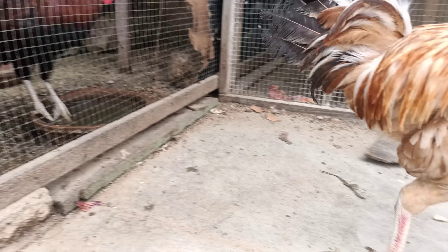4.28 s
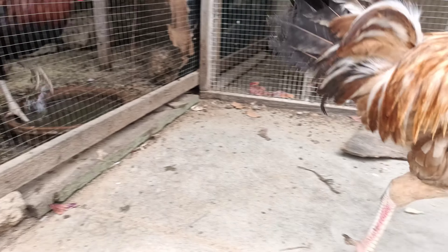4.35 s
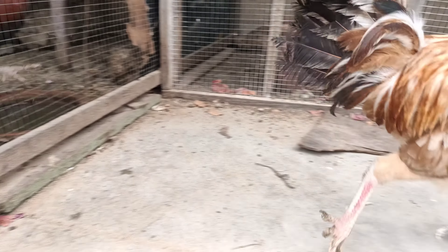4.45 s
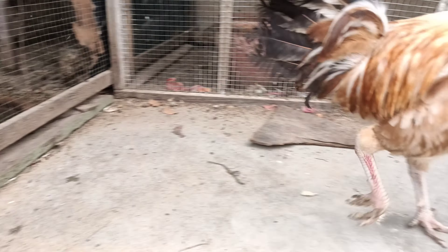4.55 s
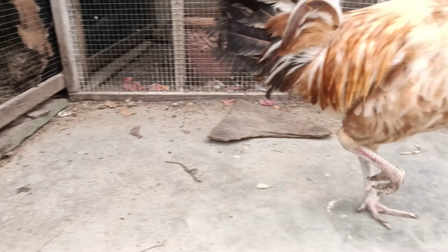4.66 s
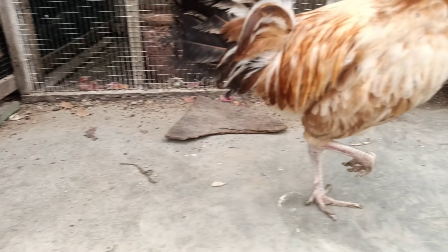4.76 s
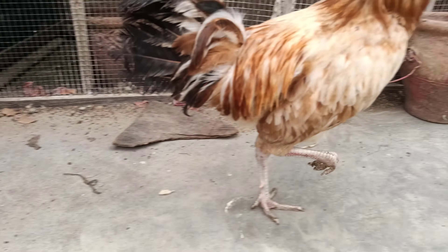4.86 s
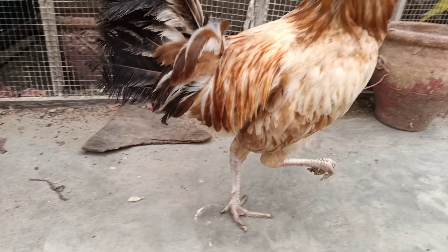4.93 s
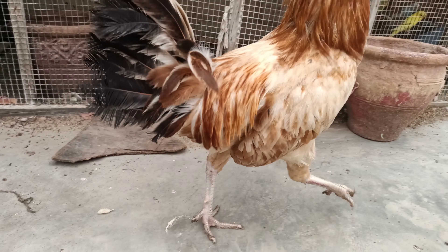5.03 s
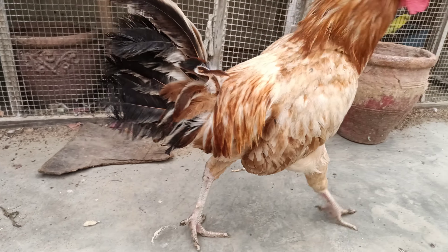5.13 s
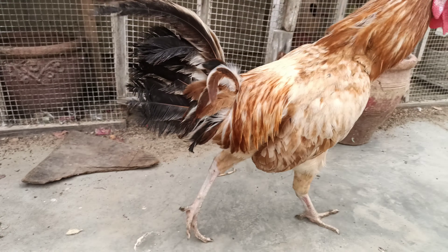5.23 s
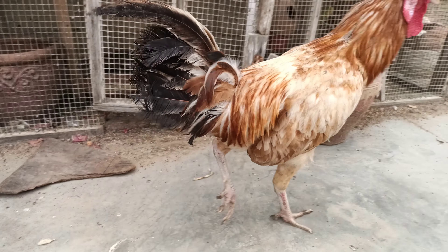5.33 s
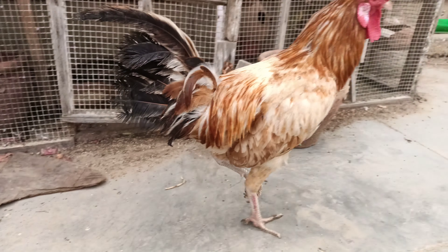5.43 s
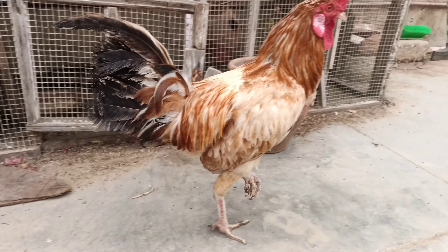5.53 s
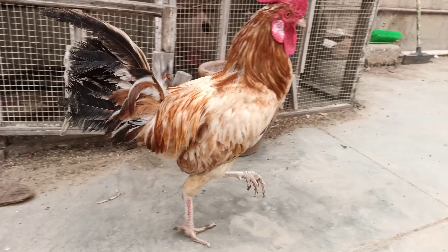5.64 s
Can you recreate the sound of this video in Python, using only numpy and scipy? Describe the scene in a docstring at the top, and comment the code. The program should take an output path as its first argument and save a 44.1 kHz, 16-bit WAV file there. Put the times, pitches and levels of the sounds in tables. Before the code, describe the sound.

Wind buffets the microphone while a small bird chirps raspily, then roosters cluck softly close by and claws click on concrete.

```python
"""A walled concrete yard, microphone hand-held, with wind buffeting its right port from the start.
Far fowl call, something metallic rings faintly, grit ticks and a small bird squeaks hoarsely.
The wind booms near 1 s; then the bird, a little to the right, chirps in runs of raspy falling notes.
From 3.5 s roosters cluck close by, voice pulses ringing their throats. Far calls and a second thin ring
follow, claws click on the concrete and a soft rustle comes up as the nearest rooster walks past."""
import sys
import numpy as np
from scipy import signal
from scipy.fft import rfft, irfft
from scipy.io import wavfile
from scipy.ndimage import uniform_filter1d, minimum_filter1d

SR = 44100
rng = np.random.default_rng(int(sys.argv[2]) if len(sys.argv) > 2 else 0)


def generate_wav(signal):
    """Clip the signal to [-1, 1] and save it as 16-bit WAV at the path in sys.argv[1]."""
    frames = np.transpose(np.atleast_2d(signal))
    scaled = np.clip(frames, -1, 1) * 32767
    pcm = np.round(scaled).astype(np.int16)
    wavfile.write(sys.argv[1], SR, pcm)


N = 250929
TIME = np.arange(N) / SR


def cluck(length, first_hz, top_hz, db, beak, rough=.23, peak_at=.68, sag=0.89):
    """About ten uneven pulses of arching rate ring the throat; a shut beak lowers and muffles it."""
    # throat resonances before the beak retunes them: (frequency [Hz], width [Hz], gain [dB])
    throat = [(310, 330, -1.5), (472, 100, 9.5), (870, 77, 12), (1720, 60, -9.5), (3280, 57, -23),
              (5000, 290, -39)]
    u = np.arange(round((length + 0.033) * SR)) / SR / length
    pitch = np.interp(u, [0, peak_at, 1], [first_hz, top_hz, top_hz * sag])
    pitch *= 1 + 0.17 * rough * wander(len(u), 277)
    turns = np.cumsum(pitch) / SR
    pulses = sum(np.cos(2 * np.pi * k * turns) for k in range(1, 36)) * amp(1.5 * wander(len(u), 186))
    puffs = np.exp(-(turns % 1) / .45) * rng.standard_normal(len(u))  # air escapes with each pulse
    effort = np.sin(np.pi * np.minimum(u, 1) ** 1.25).clip(0) ** 1.3
    drive = effort * (unit(pulses) + 2 * rough * unit(puffs))
    tuning = np.interp(beak, [0, 1], [0.62, 1.666])  # resonances rise as the beak opens
    tuning = tuning * (1 + 0.2 * (effort - .8))  # it opens further with effort
    voice = sum((-1) ** k * amp(level) * resonate(drive, hz * tuning, width)
                for k, (hz, width, level) in enumerate(throat))
    voice += amp(-21.5) * effort * resonate(unit(puffs), 6200, 3100)  # rasp at the edge of the beak
    muffle_db = -7.5 * max(1 - beak / 0.83, 0)
    return amp(db) * tint(voice, [(120, -6.0), (350, 9), (1000, muffle_db / 2), (1900, muffle_db + 6.5),
                                  (6500, muffle_db + 13), (12000, muffle_db - 3.0)])


def roosters():
    """Roosters clucking close to the microphone."""
    # (time [s], length [s], first pitch [Hz], top pitch [Hz], relative level [dB], beak opening [0-1])
    clucks = [(3.582, 0.041, 209.5, 351.6, -26.5, 0.5), (3.686, 0.034, 276, 337, -29, 0.36),
              (3.865, 0.034, 282.6, 342.4, -27, 0.39), (4.418, 0.032, 248, 264.6, -39.5, 0.01),
              (4.492, 0.038, 329.4, 432, -36, 0), (4.604, 0.034, 203, 310, -33.5, 0.42),
              (4.74, 0.023, 278, 291, -36.5, 0.4), (4.882, 0.032, 255.6, 315.7, -32, 0.44),
              (5.029, 0.031, 206, 268.7, -33, 0.64), (5.45, 0.044, 243, 280.7, -41, 0.09)]
    return play(clucks, cluck)


def slur(t, top_hz, fall_s, rough, overtone_db=0, low_hz=1860):
    """A thin falling whistle with two overtones; it warbles, breaks up and frays into a rasp."""
    # the small bird's throat, shaping overtones and rasp: (frequency [Hz], gain [dB])
    rasp_colour = [(1200, -29), (1650, -26), (2100, 3.5), (3000, 7.5), (4100, -3.5), (5300, -15),
                   (6500, -18.5), (8400, -13.5), (10000, -28)]
    # the same throat's effect on the fundamental: (frequency [Hz], gain [dB])
    throat_gain = [(1800, -5), (3100, 3), (4400, 1)]
    resonance_hz, spacing_hz, pull = 3106, 953, 0.852
    buzz_hz, breaks_db, breaks_hz = 426.8, 4, 65
    size = len(t)
    fallen = 1 - 1 / (1 + (t / fall_s) ** 2)
    pitch = (top_hz + (low_hz - top_hz) * fallen) * (1 + .025 * wander(size, 47.8))
    # the note lingers and swells on evenly spaced throat resonances
    catch = 2 * np.pi * (pitch - resonance_hz) / spacing_hz
    pitch -= pull * np.sin(catch) * spacing_hz / (2 * np.pi)
    rough = np.clip(rough + .35 * fallen ** 2, 0, 1)
    shake = 1 + (.008 + .09 * rough ** 2) * wander(size, 250)
    phase = phase_of(pitch * shake)
    fundamental = amp(2 * np.cos(catch) + read(throat_gain, pitch)) * np.sin(phase)
    overtones = sum(amp(read(rasp_colour, k * pitch) - 13 * fallen ** 2) * np.sin(k * phase)
                    for k in (2, 3))
    # on rough notes a slower vibration of the voice box throws sidebands, and its other side joins in
    buzz = np.sin(phase_of(buzz_hz * (1 + 0.242 * wander(size, 93.0))))
    whistle = (fundamental + amp(2.0 + overtone_db) * overtones) * (1 + 0.94 * rough * buzz)
    other_side = np.sin(phase_of(np.maximum(.74 * pitch, low_hz) * shake))
    whistle += rough * amp(breaks_db * wander(size, breaks_hz)) * other_side
    rasp = tint(tint(rng.standard_normal(size), rasp_colour), [(4000, 0.021), (6000, overtone_db)])
    rasp *= amp(0.48 * np.sin(phase_of(130 + 40 * wander(size, 47))))
    rasp_share = .95 * rough ** 2.3
    voice = np.sqrt(1 - rasp_share) * unit(whistle) + np.sqrt(rasp_share) * unit(rasp)
    flicker_db = 3 * wander(size, 220) + breaks_db * rough * wander(size, breaks_hz)
    return unit(voice * amp(flicker_db))


def chirp(top_hz, fall_s, db, rough, overtone_db, falls=2.9, attack_s=.006, fade_db_per_fall=5.5):
    """A slur that starts quickly and fades as it falls; its length is counted in fall times."""
    t = np.arange(round(falls * fall_s * SR)) / SR
    shape = np.minimum(t / attack_s, 1) * np.minimum(2 * (falls - t / fall_s), 1)
    return amp(db - fade_db_per_fall * t / fall_s) * shape * slur(t, top_hz, fall_s, rough, overtone_db)


def squeak(length, db):
    """One short, hoarse slur."""
    t = np.arange(round(length * SR)) / SR
    voice = slur(t, top_hz=3450, fall_s=0.044, rough=0.716)
    return amp(db) * unit(voice * signal.windows.tukey(len(t), .7))


def small_bird(scatter_s=0.014, chatter_per_s=9, chatter_until_s=1.9, chatter_db=-47):
    """Chirps, squeaks and faint chatter right of centre, heard directly and by early reflections."""
    # (time [s], top pitch [Hz], fall time [s], relative level [dB], roughness [0-1], overtones [dB])
    chirps = [(1.268, 3330, 0.045, -41, 0.17, -2), (1.365, 3300, 0.031, -37.5, 0.28, -8),
              (1.502, 4475, .024, -29, 0.06, -2.5), (1.608, 3730, 0.024, -34, 0, -6),
              (1.724, 4310, 0.026, -33, 0.18, -2), (1.787, 3900, 0.037, -38.5, 0.2, -10),
              (2.12, 4420, 0.026, -36.5, .15, 7.5), (2.152, 3380, 0.051, -35.5, 0.12, -3),
              (2.289, 3730, 0.03, -36, 0.65, 0), (2.484, 4260, .042, -37, .15, 4.5),
              (2.553, 3370, 0.046, -38.5, 0.38, -2), (2.831, 3535, 0.051, -38.5, 0.42, 7),
              (2.866, 3425, 0.033, -39.5, 0.25, 2), (2.923, 3850, 0.042, -36.5, 0.42, 1.5),
              (3.098, 4320, 0.034, -29, 0.3, 4.5), (3.143, 3505, 0.042, -35.5, 0.74, 0),
              (3.203, 3790, 0.041, -30.5, 0.52, -2), (3.238, 3760, 0.016, -37, 0.7, 9),
              (4.163, 4430, .04, -30.5, 0, 3.5), (4.205, 3310, 0.044, -35.5, 0.77, 6),
              (4.271, 3930, 0.034, -32.5, 0.54, 3), (4.313, 3950, 0.037, -32, 0.65, 7.5),
              (5.63, 3600, 0.026, -40, 0.44, 2.5)]
    # (time [s], length [s], relative level [dB])
    squeaks = [(.208, 0.017, -43), (.338, 0.031, -37.5), (.456, 0.043, -34.5), (.678, 0.048, -42.5),
               (.966, 0.032, -43), (1.004, .04, -44.5), (1.075, 0.044, -40), (1.295, 0.049, -33),
               (1.586, 0.022, -37.5), (2.338, 0.056, -49), (2.964, 0.04, -43)]
    mix, t = np.zeros((2, N)), np.arange(1024) / SR
    chatter = [(s, .03, chatter_db) for s in TIME[chance(chatter_per_s) & (TIME < chatter_until_s)]]
    for rows, voice in [(chirps, chirp), (squeaks + chatter, squeak)]:
        for s, *columns in rows:
            taps = rng.standard_normal((2, len(t))) * np.exp(-t / scatter_s)
            taps[:, 0] = np.linalg.norm(taps[0])  # the direct path, as strong as all reflections
            taps /= np.linalg.norm(taps[0])
            add(mix, s, signal.fftconvolve(voice(*columns)[None], taps, axes=1))
    return mix * amp([[-1], [1]])


def gusts(port, rise_s=0.011, fall_s=0.014):
    """Strength of the gusts on one port: each rises quickly, holds and dies away."""
    # (time [s], length [s], level [dB], port struck [left/right])
    blows = [(0, 0.042, -16, "right"), (0.203, 0.085, -20.5, "right"), (0.341, 0.095, -20, "left"),
             (0.49, 0.065, -16.5, "right"), (0.599, 0.86, -12, "right"), (1.517, 0.079, -14.5, "right"),
             (1.759, 0.3, -18.5, "right"), (2.042, 0.12, -20, "right"), (2.435, 0.3, -23.5, "right"),
             (2.827, 0.31, -29.5, "right"), (3.137, 0.12, -27, "right"), (3.349, 0.24, -22.5, "right"),
             (3.901, 0.3, -26.5, "right"), (4.261, 0.087, -26, "right"), (4.689, 0.055, -28, "right"),
             (5.044, 0.18, -26.5, "right"), (5.358, 0.057, -28.5, "right"), (5.659, 0.023, -26.5, "right")]
    return sum(amp(db) * np.exp(np.minimum(TIME - s, 0) / rise_s
                                - np.maximum(TIME - s - length, 0) / fall_s)
               for s, length, db, struck in blows if struck == port)


def wind(eddies_per_s=140, wash_gain=0.68, dull_db=-9, sputter_db=2.5):
    """Eddies pop on the right port over a sputtering wash, brighter in gusts; the left is sheltered."""
    # rumble of air on a port: (frequency [Hz], level [dB])
    colour = [(15, -57), (43, -4.5), (95, -1.5), (170, -0.5), (270, -6.5), (430, -10), (610, -23),
              (1070, -42.5), (2000, -82), (4000, -110)]
    # wind between the gusts: (time [s], level [dB])
    breeze = [(0, -28), (2, -31.5), (3.7, -35), (4.45, -37), (4.9, -46.5), (5.3, -41), (5.69, -38)]
    # the largest eddies, thumping on their own: (time [s], peak [dB], half width [s])
    buffets = [(0.404, -1.5, 0.00059), (0.737, -9, 0.00073), (1.246, -4.5, 0.00041), (1.374, -4, 0.0005),
               (1.427, -3, 0.00088), (1.547, 0.5, 0.00053), (1.578, -10.5, 0.00064), (1.91, -2, 0.0013),
               (1.946, -6.5, 0.00055), (2.053, -4, 0.0016), (2.138, -9.5, 0.00056), (2.685, -3.5, 0.00094),
               (2.741, -8.5, 0.0012), (3.036, -12, 0.00077), (3.53, -5.5, 0.0011), (4.29, -9, 0.0012)]
    wind_db = 20 * np.log10(np.hypot(gusts("right"), amp(np.interp(TIME, *np.transpose(breeze)))))
    eddies = chance(eddies_per_s) * rng.uniform(0.54, 1, N)
    pops = np.imag(signal.hilbert(tint(eddies, colour)))  # each a push, then a suck
    wash = tint(tint(rng.standard_normal(N), colour), [(160, 2.1), (500, -1.1)])
    hard = unit(pops + wash_gain * wash)
    soft = tint(hard, [(160, 0.0038), (500, dull_db)])
    force = np.clip((wind_db + 29) / 17, 0, 1)
    flow = force * hard + (1 - force) * soft
    running_rms = np.sqrt(uniform_filter1d(flow ** 2, size=2600) + 0.0046)
    right = amp(wind_db + sputter_db * wander(N, 47.0)) * flow / running_rms
    for s, db, half_width in buffets:
        u = np.arange(-SR // 100, SR // 100) / SR / half_width
        add(right, s - .01, -amp(db) * u * np.exp((1 - u ** 2) / 2))
    sheltered = tint(rng.standard_normal(N), [(15, 10.5), (100, -8.5), (250, -7.0), (600, -44)])
    left = amp(-33 + 0.23 * wind_db) * sheltered + gusts("left") * tint(rng.standard_normal(N), colour)
    return np.array([left, right])


def wind_boom(start_s=.6, length_s=0.67, hz=95, width_hz=14, db=-20):
    """At its strongest the wind booms on one low note at the right port."""
    mix, size = np.zeros((2, N)), round(length_s * SR)
    drone = resonate(resonate(rng.standard_normal(size), hz, width_hz), hz, 51)
    add(mix[1], start_s, amp(db) * unit(drone) * signal.windows.tukey(size, .3))
    return mix


def gust_hiss(start_s=.73, length_s=.5, db=-47):
    """A soft, even hiss on both ports during the strongest gust."""
    # (frequency [Hz], level [dB])
    colour = [(1200, 3.5), (2500, 13.5), (4300, 2.5), (6000, 4.5), (7500, -8), (12000, -47)]
    mix, size = np.zeros((2, N)), round(length_s * SR)
    hiss = tint(rng.standard_normal((2, size)), colour)
    add(mix, start_s, amp(db) * hiss * signal.windows.tukey(size, .25))
    return mix


def grit(gain_db=8, faint_per_s=0.75, faint_db=-45, decay_s=.0016, bounce_s=0.0052, bounce_db=-5.5):
    """Each grain hits the concrete with a tiny crack and bounces once; faint ones fall at random."""
    # the sharpest ticks: (time [s], relative peak [dB])
    ticks = [(0.161, -34.5), (0.234, -37), (0.332, -34.5), (0.4253, -35), (0.523, -35), (1.064, -35.5),
             (1.144, -36.5), (2.2167, -28), (2.3038, -34.5), (2.445, -34.5), (2.546, -32), (2.629, -30.5),
             (2.724, -33.5), (2.79, -33.5)]
    # spectrum of a crack: (frequency [Hz], level [dB])
    colour = [(800, 10), (2000, 6.5), (4000, 9.5), (8000, 12.5), (11000, 3.5), (14000, 11), (16000, -6)]
    mix, t = np.zeros((2, N)), np.arange(1024) / SR
    faint = [(s, faint_db) for s in TIME[chance(faint_per_s)]]
    for s, db in ticks + faint:
        for delay_s, drop_db in [(0, 0), (bounce_s, bounce_db)]:
            crack = tint(rng.standard_normal((2, len(t))) * np.exp(-t / decay_s), colour)
            add(mix, s + delay_s, amp(db + drop_db + gain_db) * crack[:, :800] / abs(crack).max())
    return mix


def claws(decay_s=0.0034):
    """Claws click brightly on the concrete, close to the left port."""
    # (time [s], relative level [dB])
    clicks = [(3.47, -30), (3.9764, -37), (4.1085, -41), (4.1297, -38), (4.4752, -38), (4.603, -36),
              (4.8877, -35.5), (5.258, -39)]
    mix, t = np.zeros((2, N)), np.arange(600) / SR
    for s, db in clicks:
        noise = rng.standard_normal((2, len(t)))
        click = tint(noise, [(2000, -32), (5000, 1.5), (13000, 7.5), (16000, 5.5)]) * np.exp(-t / decay_s)
        add(mix, s, amp(db) * click * amp([[4], [-4]]))
    return mix


def far_note(length, first_hz, last_hz, db, harmonic, hoarse):
    """A hoarse or clear note of which only the harmonics near one resonance carry."""
    u = np.linspace(0, 1, round(length * SR))
    shake = 1 + .2 * hoarse * wander(len(u), 130)
    phase = phase_of((first_hz + (last_hz - first_hz) * u) * shake)
    note = sum(np.sin(k * phase) / (1 + (k - harmonic) ** 4 * 9) for k in range(1, 8))
    return amp(db) * unit(note * amp(3.8 * wander(len(u), 300)) * signal.windows.tukey(len(u), .5))


def far_fowl_and_metal():
    """Far fowl calls, and two faint thin metallic rings (0.113 s, 3.75 s), perhaps wire mesh."""
    # (time [s], length [s], first pitch [Hz], last pitch [Hz], relative level [dB],
    #  resonance [harmonic number], hoarseness [0 = clear])
    notes = [(0, 0.33, 850, 710.5, -49, 1.08, .26), (.113, .05, 1137, 1120, -49.5, 1.54, 0.05),
             (3.745, 0.087, 563, 467, -39, 0.93, 1.12), (3.75, 0.046, 382, 360, -52.5, 5.52, 0),
             (3.89, 0.062, 498, 555, -42.5, 0.57, 0.34), (4.69, 0.038, 966, 1170, -55, 2.46, 0.3),
             (4.765, 0.077, 1230, 1072, -56, 1.5, 0.11), (4.84, 0.12, 1106, 867, -54.5, 2.37, 0.45),]
    return play(notes, far_note)


def rustle(rest_db=-52.5):
    """A grainy rustle that swells now and then: a short scuff near the start, and later swells as the rooster
    moves."""
    # (middle [s], half length [s], level [dB])
    swells = [(0.128, 0.017, -35.5), (4.444, 0.059, -45), (4.786, 0.18, -42.5), (5.311, 0.16, -39)]
    # (frequency [Hz], level [dB])
    colour = [(500, 13), (1000, 1.5), (2500, 4), (4500, 0), (7500, -5.5), (10000, -9), (14000, -7),
              (16000, -23)]
    grains = rng.standard_normal((2, N)) * amp(1.4 * wander(N, 360) + .8 * wander(N, 31))
    swell_power = sum(amp(db) ** 2 * np.exp(-2 * ((TIME - s) / half) ** 2) for s, half, db in swells)
    return np.sqrt(amp(rest_db) ** 2 + swell_power) * tint(grains, colour)


def yard_air(db=-45, likeness=0.8):
    """Steady outdoor air, partly alike on the two ports."""
    # (frequency [Hz], level [dB])
    colour = [(25, 0), (130, -4), (450, -5.5), (1000, -27), (1600, -33), (2600, -20), (5000, -96),
              (8500, -32), (10000, -47.5), (14000, -35), (16000, -55)]
    return amp(db) * tint(rng.standard_normal((2, N)) + likeness * rng.standard_normal(N), colour)


def walls(x, echoes_per_s=2000, gap_s=.004):
    """Sparse reflections from walls and coops, each band dying at its own speed."""
    # the yard's reverberation: (frequency [Hz], time to fall 60 dB [s])
    decay = [(200, 0.52), (600, 0.43), (1500, 0.096), (3000, 0.4), (9000, 0.049)]
    taps = rng.standard_normal((2, SR)) * chance(echoes_per_s, (2, SR)) * (np.arange(SR) > gap_s * SR)
    hz, t, bands = signal.stft(taps, SR, nperseg=256)
    tail = signal.istft(bands * amp(-60 * t / read(decay, hz)[:, None]), SR, nperseg=256)[1]
    return signal.fftconvolve(np.atleast_2d(x), tail / np.linalg.norm(tail[0]), axes=1)[:, :N]


def ports(x, lead_ms, balance_db):
    """A sound reaches the two ports at different times and levels; positive values favour the left."""
    early = irfft(rfft(x) * np.exp(2j * np.pi * np.fft.rfftfreq(N, 1000 / SR) * lead_ms), N)
    return np.array([early * amp(balance_db / 2), x * amp(-balance_db / 2)])


def amp(db):
    """Decibels to gain."""
    return 10 ** (np.asarray(db) / 20)


def unit(x):
    """Scales to rms 1."""
    return x / np.sqrt(np.mean(x ** 2) + 1e-20)


def phase_of(hz):
    """Running phase of a moving frequency."""
    return 2 * np.pi * np.cumsum(hz) / SR


def chance(per_s, shape=N):
    """Marks random samples at a mean rate."""
    return rng.random(shape) < per_s / SR


def read(points, hz):
    """Reads a curve on a log-frequency axis."""
    f, value = np.transpose(points)
    return np.interp(np.log(hz + 1), np.log(f + 1), value)


def tint(x, points):
    """Filters by (frequency [Hz], gain [dB]) points and scales to rms 1."""
    size = x.shape[-1]
    return unit(irfft(rfft(x) * amp(read(points, np.fft.rfftfreq(size, 1 / SR))), size))


def wander(size, rate_hz):
    """Smooth random drift of rms about 1, rolling off above the rate."""
    hz = np.fft.rfftfreq(size + SR // 4, 1 / SR)
    return unit(irfft(rfft(rng.standard_normal(size + SR // 4)) / (1 + (hz / rate_hz) ** 4)))[:size]


def resonate(x, hz, width):
    """A resonance of gain 1 that can follow a moving frequency."""
    turn = np.exp(1j * phase_of(hz * np.ones(len(x))))
    pole = np.exp(-np.pi * width / SR)
    return 2 * (turn * signal.lfilter([(1 - pole) / 2] * 2, [1, -pole], x / turn)).real


def add(mix, s, sound):
    """Mixes a sound in at a time."""
    part = mix[..., max(round(s * SR), 0):][..., :sound.shape[-1]]
    part += sound[..., :part.shape[-1]]


def play(rows, voice):
    """Plays one sound for each row."""
    mix = np.zeros(N)
    for s, *columns in rows:
        add(mix, s, voice(*columns))
    return mix


def scene():
    """Near clucks, a small bird, far fowl, faint metal and grit, with wind on the microphone."""
    clucks, bird, far = roosters(), small_bird(), far_fowl_and_metal()
    bed = wind() + wind_boom() + yard_air() + rustle() + gust_hiss()
    ticks = grit()
    near = amp(0.5) * ports(clucks, lead_ms=0.072, balance_db=-1.5) + bird
    echoes = walls(amp(-13.5) * clucks + amp(-13) * bird + amp(0.5) * far + amp(-12.0) * ticks)
    return near + amp(3.0) * far + ticks + claws() + echoes + bed


def record(dry, ceiling=.9, edge_hz=16100):
    """The recorder's fast limiter rounds off the hardest gusts; a low-pass cuts the top treble."""
    needed_gain = np.minimum(1, ceiling / (abs(dry) + 1e-9))
    gain = uniform_filter1d(minimum_filter1d(needed_gain, size=120), size=120)
    lowpass = signal.firwin(511, edge_hz, window=("kaiser", 9), fs=SR)
    return signal.oaconvolve(dry * gain, lowpass[None], "same")


dry = scene()
out = record(dry)
generate_wav(out)
```